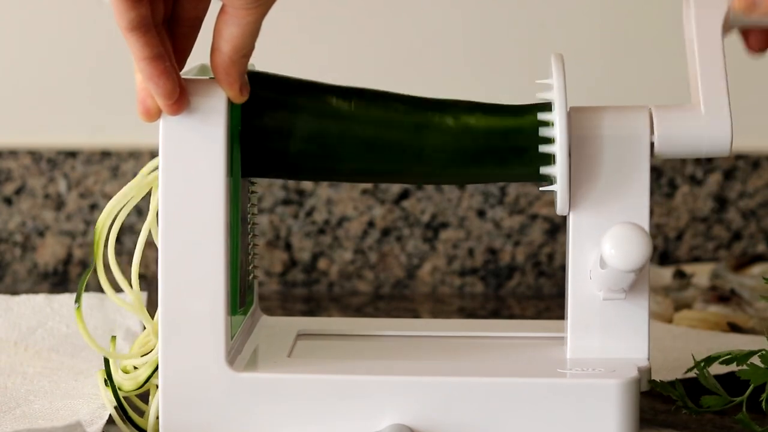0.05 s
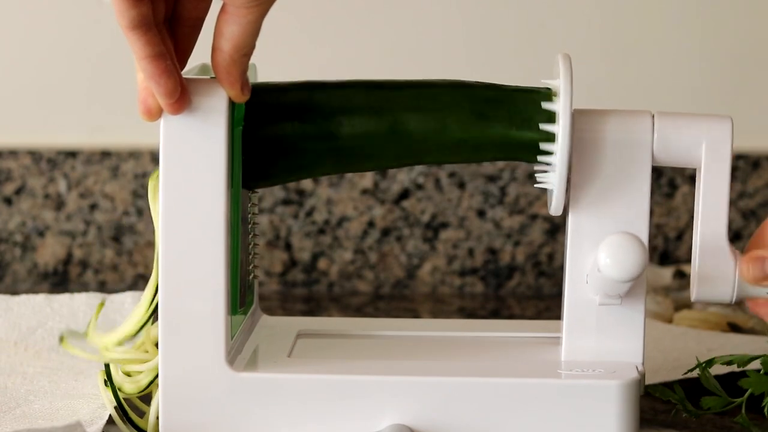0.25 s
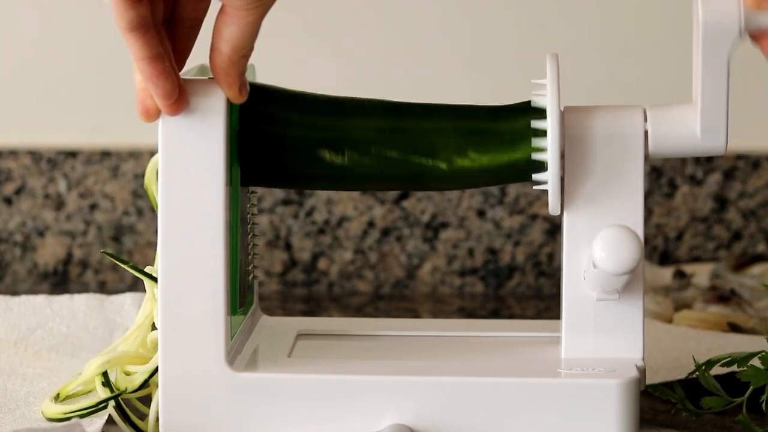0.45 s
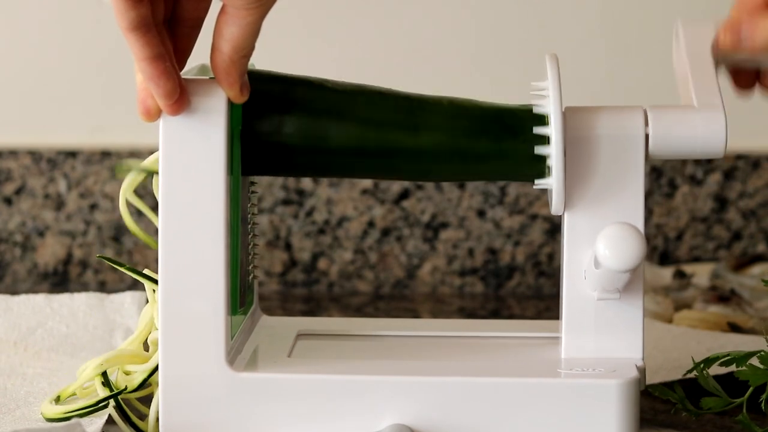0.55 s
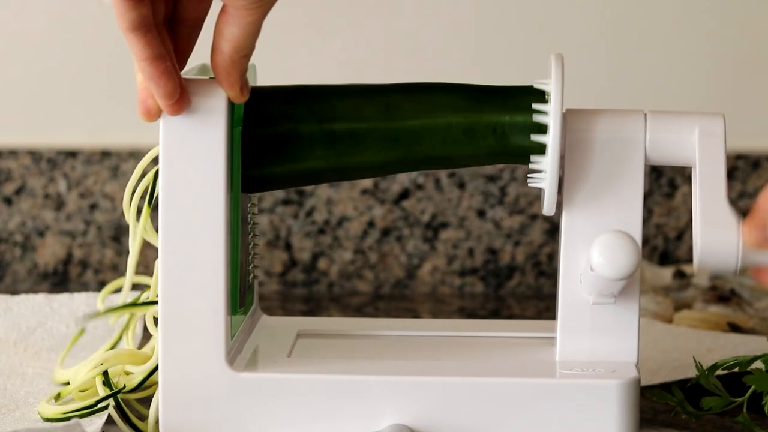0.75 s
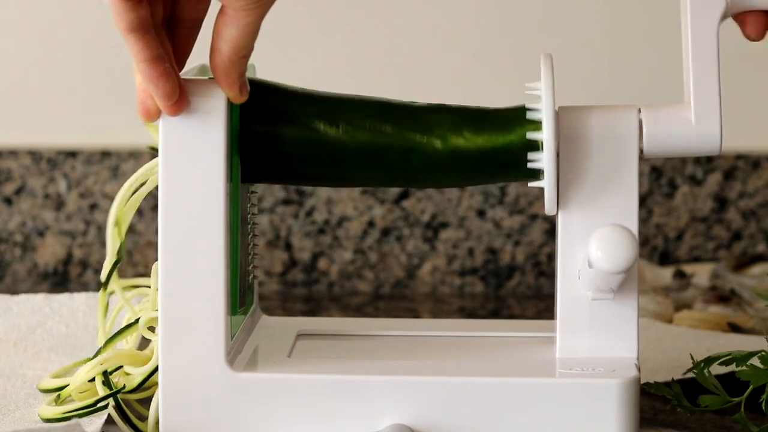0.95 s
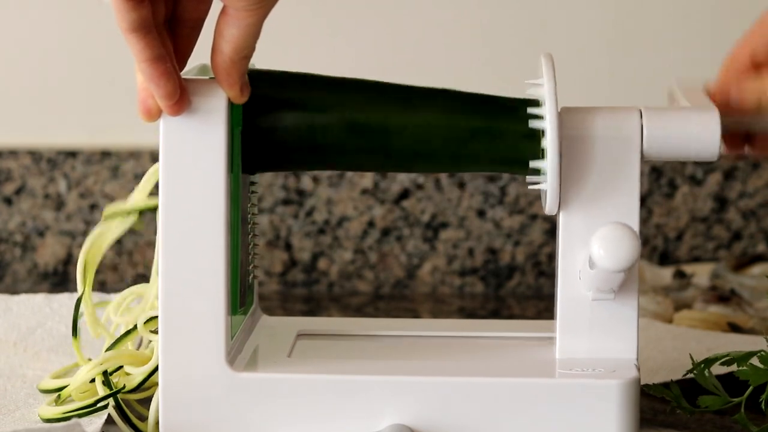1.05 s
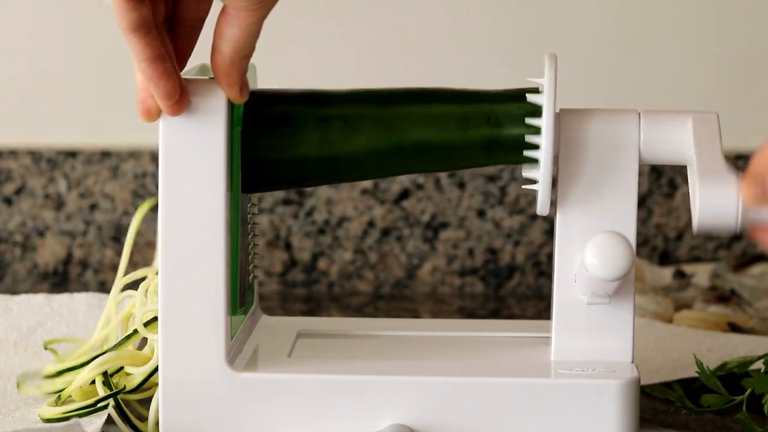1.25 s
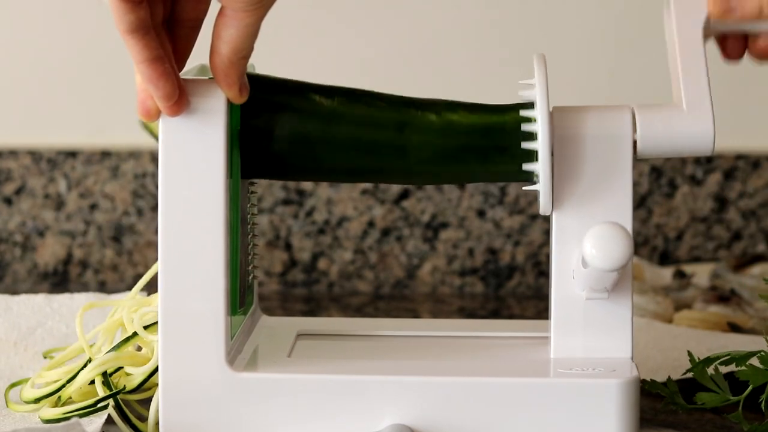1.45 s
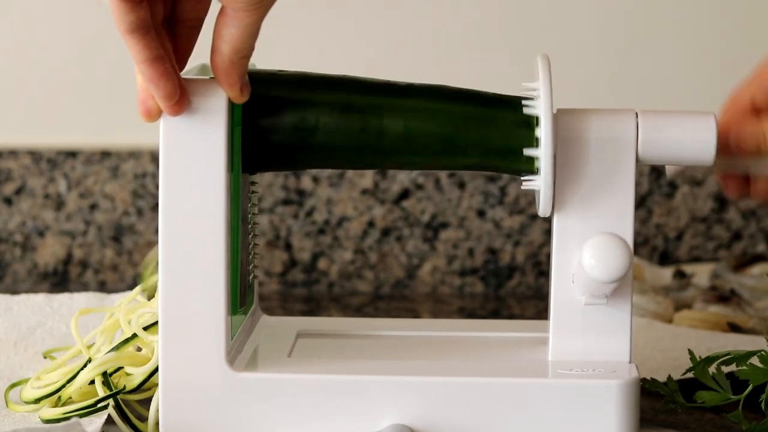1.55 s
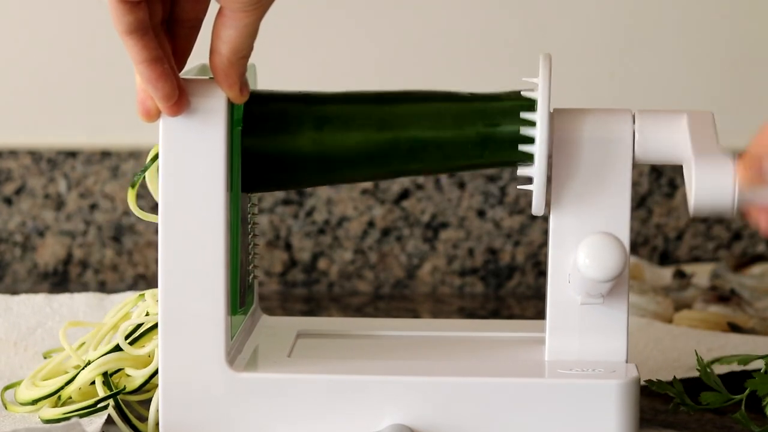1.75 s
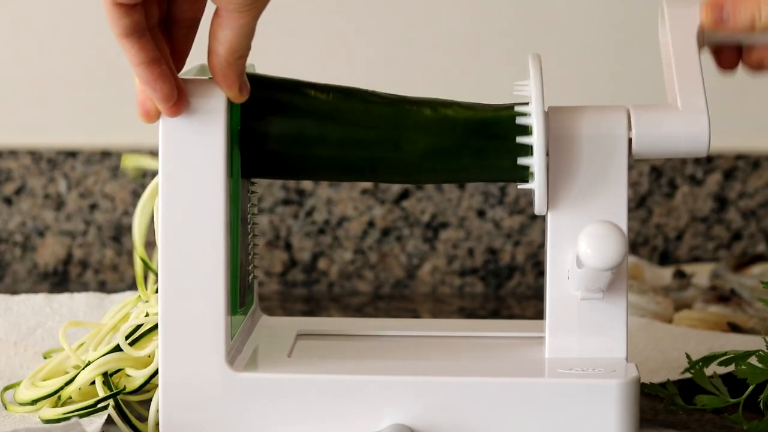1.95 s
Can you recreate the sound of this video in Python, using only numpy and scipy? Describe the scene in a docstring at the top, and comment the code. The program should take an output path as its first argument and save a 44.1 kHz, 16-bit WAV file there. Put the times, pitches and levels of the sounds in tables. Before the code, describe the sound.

Hollow plastic knocking of a spiralizer being cranked, with a zucchini crunching against the blade.

```python
"""Spiralizer shaving a zucchini

A hand-cranked plastic spiralizer on a kitchen counter, about two turns a second.
The loose crank and carriage knock in the hollow frame, hardest once a turn, and rock it on its feet.
The blade cuts with a wet fizz, the skin crunches, the frame rumbles; the small room answers briefly."""
import sys
import numpy as np
from scipy import signal
from scipy.fft import rfft, irfft
from scipy.io import wavfile

SR = 44100
rng = np.random.default_rng(int(sys.argv[2]) if len(sys.argv) > 2 else 0)


def unload_wav(signal):
    """Save mono or channel-first audio to the path in sys.argv[1] as 16-bit WAV at rate SR, clipped to [-1, 1]."""
    wavfile.write(
        sys.argv[1],
        SR,
        np.round(np.clip(np.atleast_2d(signal).T, -1, 1) * 32767).astype(np.int16),
    )


N = 88200
TIME_S = np.arange(N) / SR

# cutting effort (time [s], relative level [dB])
CUT_EFFORT = [(0, -45), (.12, -48.5), (.195, -52), (.28, -41.5), (.35, -44), (.52, -47.5), (.68, -48.5),
              (.75, -40.5), (.87, -46), (1.0, -47.5), (1.15, -49.5), (1.225, -41.5), (1.29, -45.5),
              (1.42, -46.5), (1.585, -51.5), (1.68, -45.5), (1.82, -43.5), (2, -50)]
# noise spectra (frequency [Hz], relative density [dB])
FIZZ_SPECTRUM = [(600, -2.5), (1500, 5), (3000, -0.5), (4500, 3.5), (7000, -2.5), (11000, -1.5),
                 (16000, -10)]
RUMBLE_SPECTRUM = [(20, -55), (40, -45), (57, -9.5), (115, -18.5), (240, -18.5), (380, -4), (500, 0),
                   (720, -8.5), (1100, -11), (1700, -21), (4000, -41)]
CLICK_SPECTRUM = [(150, 4.5), (700, 17), (1300, 6), (2800, -1.5), (4300, -2), (7000, -13), (11000, -16.5),
                  (16000, -28)]
SNAP_SPECTRUM = [(3000, -8), (5000, 4.5), (10500, -1.5), (16000, -12.5)]
# crank and carriage knocks (time [s], frame [dB], panels [dB], walls [dB], relative contact level [dB])
KNOCK_HITS = [(0.029, -27, -53, -36, -41.5), (0.0901, -26, -27.5, -42, -32.5),
              (0.0957, -26, -50, -37.5, -55), (0.1805, -25, -55, -34.5, -43),
              (0.2033, -19.5, -35, -33, -44), (0.2097, -20.5, -22, -25, -28.5),
              (0.2171, -24, -26, -29, -39), (0.2319, -15.5, -18, -36, -28.5), (0.2341, -9, -9, -19.5, -43),
              (0.2424, -20, -47, -36.0, -52), (0.2568, -22.0, -40, -28, -40),
              (0.2895, -24.0, -23, -35, -44), (0.299, -16, -27, -20.5, -30),
              (0.3061, -14.5, -45, -24.5, -32.5), (0.3248, -32, -14.5, -24, -30),
              (0.4517, -18, -60, -28, -33.5), (0.4808, -31, -37, -33, -42), (0.498, -25, -32, -47, -42.5),
              (0.5555, -21, -25, -29, -36), (0.6457, -29, -28, -50, -51), (0.654, -23, -23, -32, -41.5),
              (0.693, -32.5, -30, -25.5, -30.5), (0.6961, -19.5, -25.5, -43, -50),
              (0.7113, -11, -34, -25.5, -31.5), (0.7539, -20.5, -32, -41, -36.5),
              (0.769, -22, -26, -30, -41), (0.7848, -17.5, -32, -29, -42), (0.8903, -20.5, -24.5, -62, -35),
              (0.8983, -24, -44, -25.5, -40), (0.972, -23.5, -42, -27, -34.5),
              (0.9838, -26, -31.0, -43, -41), (1.023, -26.5, -15.5, -25.5, -31),
              (1.1098, -22.5, -25, -49.0, -43), (1.1313, -25.5, -39, -35, -48),
              (1.1572, -25.5, -24, -33.5, -35.5), (1.1958, -26.5, -26, -33, -46),
              (1.2337, -26, -31, -42, -41), (1.2512, -24.0, -61, -29.5, -37),
              (1.3402, -29.5, -43, -38, -56), (1.3738, -23.5, -27, -36.5, -42.5),
              (1.4769, -28.5, -15, -21, -30.5), (1.5744, -27, -28.5, -37, -43.5),
              (1.6015, -14.5, -14.5, -25, -33), (1.6073, -45, -19, -27, -30.5),
              (1.618, -14, -16, -17, -28.5), (1.6451, -27, -40, -29.5, -45), (1.6589, -18, -24, -31, -37),
              (1.6924, -17.5, -17.5, -29.5, -37), (1.702, -17, -18.5, -29.5, -39),
              (1.7105, -18.5, -43.5, -25.5, -37.5), (1.7284, -28, -23, -36, -51),
              (1.7672, -26.5, -30, -47, -64), (1.8856, -26, -52, -62, -60),
              (1.909, -23.5, -23.5, -34.5, -37), (1.951, -24.5, -22, -29.5, -36)]
# bright snaps of the crispest contacts (time [s], level [dB])
SNAP_HITS = [(.0905, -40.5), (.2118, -40), (.2995, -40), (.327, -45), (.556, -45), (.6918, -34.5),
             (.7118, -41), (1.023, -36.5), (1.157, -42), (1.4762, -35.5), (1.602, -42), (1.6185, -40),
             (1.7125, -38), (1.951, -44)]
# frame rocking on its feet (time [s], level [dB])
THUMP_HITS = [(0.091, -48), (0.235, -43), (0.454, -39.5), (.557, -53), (0.698, -40), (0.714, -50),
              (0.771, -49), (0.901, -44), (1.025, -54), (1.163, -44), (1.481, -51), (1.607, -41),
              (1.699, -43), (1.909, -46)]
# skin tearing (time [s], band centre [Hz], level [dB])
SKIN_TEARS = [(.204, 3720, -30.5), (0.213, 4300, -34.5), (0.2992, 5750, -42), (.692, 3900, -30.5),
              (.783, 4100, -40), (1.110, 3950, -45), (1.1579, 3760, -37), (1.248, 3350, -42),
              (1.373, 2400, -55), (1.602, 4170, -30), (1.619, 4630, -43), (1.703, 2420, -30),
              (1.704, 5700, -39)]
# load peaks, grouped once a turn (time [s], level [dB])
JOLT_HITS = [(0.2356, -22.5), (0.2565, -40), (0.7147, -17.5), (0.7507, -31), (0.7861, -25.5), (1.2508, -39),
             (1.6198, -18.5), (1.635, -24), (1.666, -31)]
# modes of hollow frame, side panels, thin walls, feet, housing (frequency [Hz], gain [dB], T60 [s])
FRAME_MODES = [(395.4, -7, .04), (430, -9.5, 0.081), (481, -4.5, 0.096), (524.8, 11.5, 0.039)]
PANEL_MODES = [(613.5, 5, 0.036), (652, 3.5, 0.059), (731, 2.5, 0.027)]
WALL_MODES = [(810, 2.5, 0.049), (920.8, 3.5, 0.038), (969, 3, 0.028), (1120, 2.5, 0.027),
              (1174, -10, 0.044)]
FEET_MODES = [(57.7, -9, 0.57), (110.4, 0.5, 0.14), (178, -4, 0.12)]
HOUSING_MODES = [(415, -16, .07), (482, 0, .13)]
# modes of the stiff ribs (frequency [Hz], gain [dB])
RIB_MODES = [(1290, 8), (1450, 4.5), (1600, 12), (1760, 10), (1910, 6.5), (2130, 5.5), (2340, 3.5),
             (2820, 0.5), (3240, -4.5), (3840, 0.5), (4370, -4)]

FRAME_LOW_CUT_HZ = 255


def from_db(db):
    """Decibels to gain."""
    return 10 ** (np.asarray(db) / 20)


def unit_rms(x):
    """Scale to rms 1."""
    return x / np.sqrt(np.mean(x ** 2) + 1e-20)


def filtered(x, order, hz, kind):
    """Causal Butterworth filter."""
    return signal.sosfilt(signal.butter(order, hz, kind, fs=SR, output="sos"), x)


def coloured(noise, spectrum):
    """Shape noise to a spectrum; rms 1."""
    hz, db = np.transpose(spectrum)
    bins_hz = np.maximum(np.arange(N // 2 + 1) * SR / N, 1)
    gain = from_db(np.interp(np.log(bins_hz), np.log(hz), db))
    return unit_rms(irfft(rfft(noise) * gain, N))


def add_hit(out, time_s, level_db, sound):
    """Mix in a sound; level_db is the rms of its first 7 ms."""
    start = int(time_s * SR)
    part = sound[:max(N - start, 0)]
    attack_rms = np.sqrt(np.mean(sound[:int(0.007 * SR)] ** 2))
    out[start:start + len(part)] += part * from_db(level_db) / attack_rms


def struck(times_s, levels_db, modes, contact_s, scatter_db=2):
    """Each blow rings all modes at scattered strengths; a softer contact builds more slowly."""
    hz, db, t60_s = np.transpose(modes)[:, :, None]
    t, out = TIME_S[:N // 6], np.zeros(N)
    rings = np.sin(2 * np.pi * hz * t) * from_db(db - 60 * t / t60_s) * (1 - np.exp(-t / contact_s))
    for time_s, level_db in zip(times_s, levels_db):
        strengths = from_db(scatter_db * rng.standard_normal(len(modes)))
        add_hit(out, time_s, level_db, strengths @ rings)
    return out


def blade_cut(cells_per_s=9000, spread_db=2.5, rumble_db=-38, judder_db=1.8, judder_cutoff_hz=45):
    """Cells burst at the blade in a fine fizz; the drag makes the frame rumble and judder."""
    effort_db = np.interp(TIME_S, *np.transpose(CUT_EFFORT))
    sizes = from_db(spread_db * np.minimum(rng.exponential(1, N), 5)) * rng.choice([-1, 1], N)
    bursts = sizes * (rng.random(N) < cells_per_s / SR)
    fizz = coloured(bursts, FIZZ_SPECTRUM) * from_db(effort_db - 0.5)
    judder = unit_rms(filtered(rng.standard_normal(N), 2, judder_cutoff_hz, "low"))
    drag_db = rumble_db + 0.83 * (effort_db - effort_db.mean()) + judder_db * judder
    rumble = coloured(rng.standard_normal(N), RUMBLE_SPECTRUM) * from_db(drag_db)
    return fizz + rumble


def plastic_clicks(times_s, levels_db, spectrum, t60_s, attack_s):
    """Hard plastic contacts: dense, fast-dying noise bursts."""
    noise = coloured(rng.standard_normal(N), spectrum)
    t, out = TIME_S[:N // 20], np.zeros(N)
    envelope = from_db(-60 * t / t60_s) * (1 - np.exp(-t / attack_s))
    offsets = rng.integers(0, N - len(t), len(times_s))
    for time_s, level_db, offset in zip(times_s, levels_db, offsets):
        add_hit(out, time_s, level_db, noise[offset:offset + len(t)] * envelope)
    return out


def crank_knocks(rib_t60_s=0.045):
    """Play in crank and carriage: a hollow clunk, ringing panels, walls and ribs, a click on top."""
    times_s, frame_db, panel_db, wall_db, contact_db = np.transpose(KNOCK_HITS)
    frame = struck(times_s, frame_db, FRAME_MODES, contact_s=0.0028)
    panels = struck(times_s, panel_db, PANEL_MODES, contact_s=0.0014)
    walls = struck(times_s, wall_db, WALL_MODES, contact_s=0.00091)
    rib_modes = [(hz, db, rib_t60_s) for hz, db in RIB_MODES]
    ribs = struck(times_s, contact_db - 1, rib_modes, contact_s=0.00029, scatter_db=5)
    clicks = plastic_clicks(times_s, contact_db + 4.5, CLICK_SPECTRUM, t60_s=0.051, attack_s=0.001)
    snaps = plastic_clicks(*np.transpose(SNAP_HITS), SNAP_SPECTRUM, t60_s=0.015, attack_s=0.0001)
    # a small body radiates little bass
    body = filtered(frame + panels + walls + ribs, 3, FRAME_LOW_CUT_HZ, "high")
    return body + clicks + snaps


def feet_thumps(low_cut_hz=50):
    """The rocking frame thumps dully on the counter."""
    thumps = struck(*np.transpose(THUMP_HITS), FEET_MODES, contact_s=0.0044, scatter_db=3)
    return filtered(thumps, 3, low_cut_hz, "high")


def skin_crunches(width_hz=1800, t60_s=0.04):
    """The skin tears under the blade: short noise bursts, each in its own band."""
    t, out = TIME_S[:N // 20], np.zeros(N)
    for time_s, centre_hz, level_db in SKIN_TEARS:
        burst = rng.standard_normal(len(t)) * from_db(-60 * t / t60_s)
        band_hz = [centre_hz - width_hz / 2, centre_hz + width_hz / 2]
        add_hit(out, time_s, level_db, filtered(burst, 2, band_hz, "band"))
    return out


def housing_jolts():
    """Load peaks jolt the whole housing, which rings on a low note."""
    ringing = struck(*np.transpose(JOLT_HITS), HOUSING_MODES, contact_s=0.0024)
    return filtered(ringing, 3, FRAME_LOW_CUT_HZ, "high")


def kitchen_reverb(x, t60_s=0.21, delay_s=0.0086, cutoff_hz=3500, send_db=-10.5):
    """Counter and room walls return a short, dull tail."""
    t = TIME_S[:N // 4]
    tail = rng.standard_normal(len(t)) * from_db(-60 * t / t60_s) * (t > delay_s)
    tail = filtered(tail / np.linalg.norm(tail), 1, cutoff_hz, "low")
    return signal.fftconvolve(x * from_db(send_db), tail)[:N]


def scene():
    """Blows and their room tail over the dry cutting noise; mono."""
    blows = crank_knocks() + housing_jolts() + feet_thumps() + skin_crunches()
    return (blows + kitchen_reverb(blows) + blade_cut())[None]


def record(dry):
    """Clip at full scale, then low-pass steeply."""
    cutoff_hz = 15950
    low_pass = signal.ellip(10, 0.1, 90, cutoff_hz, fs=SR, output="sos")
    return signal.sosfilt(low_pass, np.clip(dry, -1, 1))


dry = scene()
out = record(dry)
unload_wav(out)
```